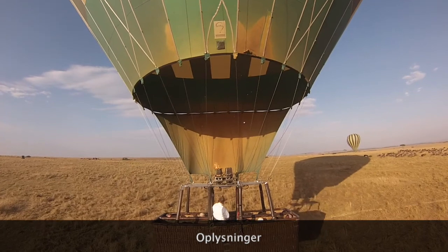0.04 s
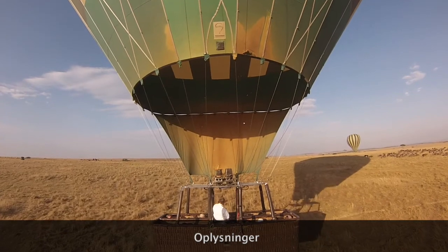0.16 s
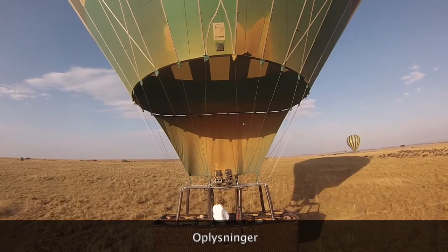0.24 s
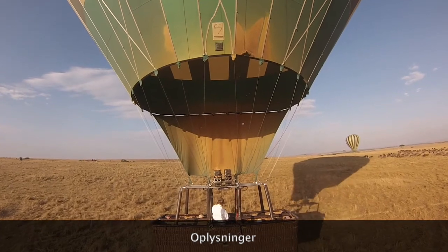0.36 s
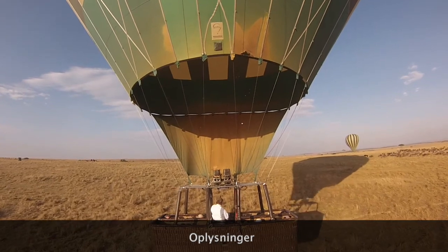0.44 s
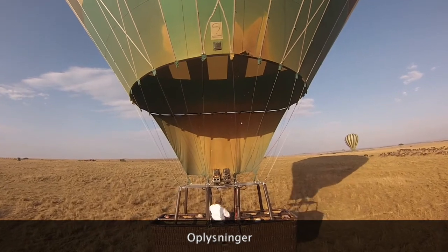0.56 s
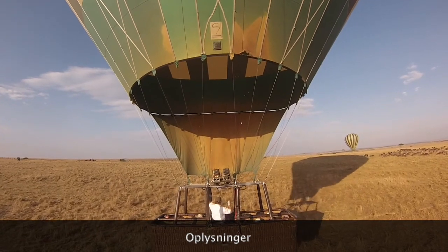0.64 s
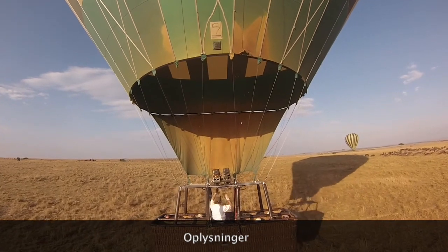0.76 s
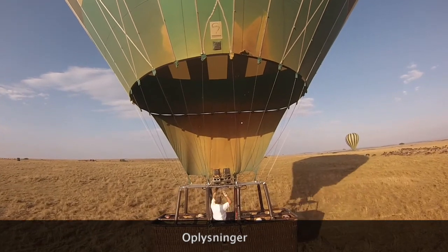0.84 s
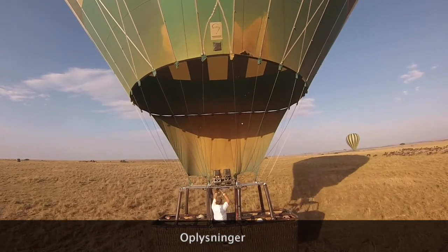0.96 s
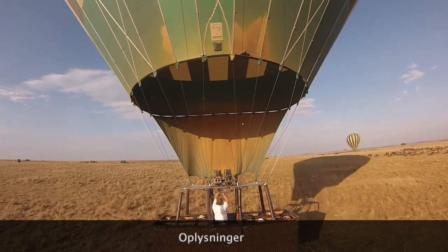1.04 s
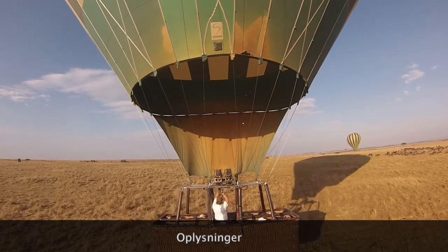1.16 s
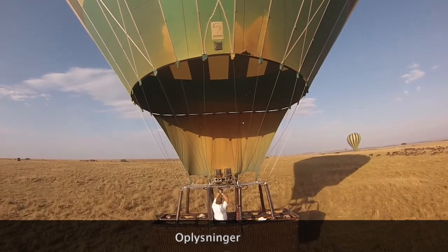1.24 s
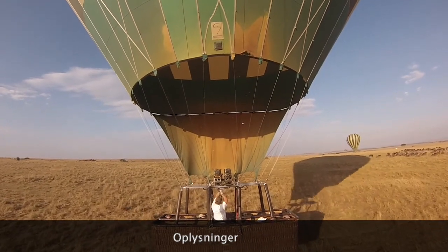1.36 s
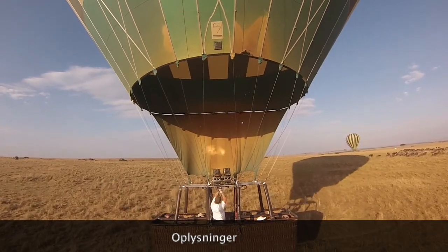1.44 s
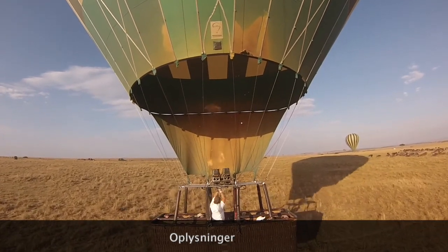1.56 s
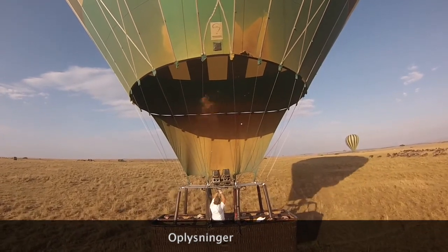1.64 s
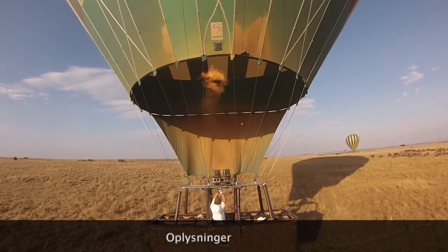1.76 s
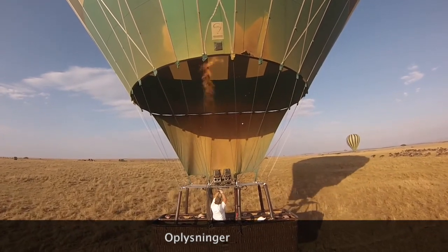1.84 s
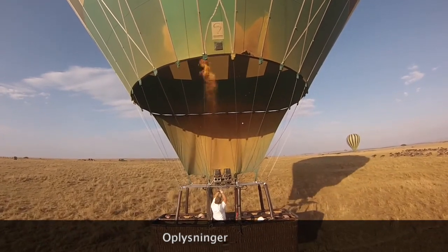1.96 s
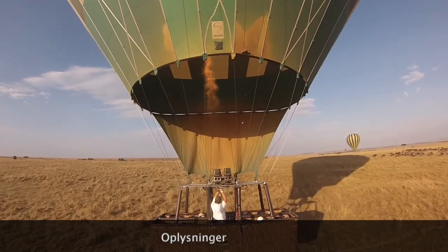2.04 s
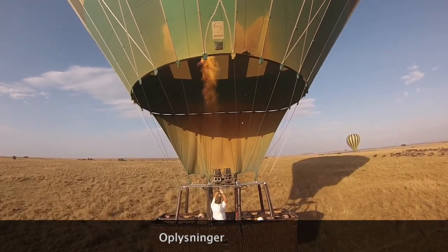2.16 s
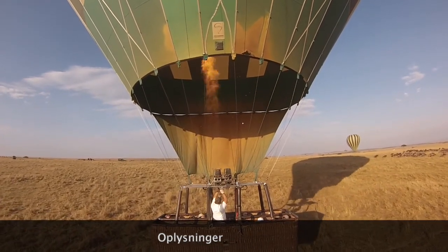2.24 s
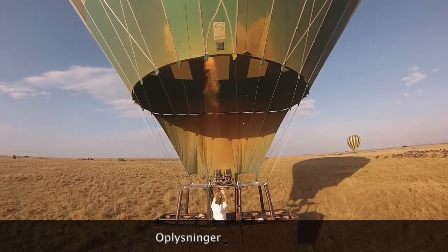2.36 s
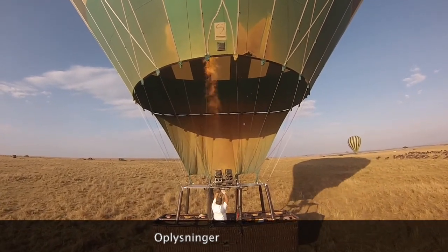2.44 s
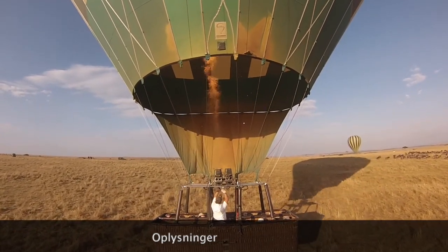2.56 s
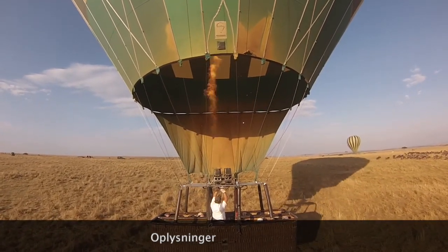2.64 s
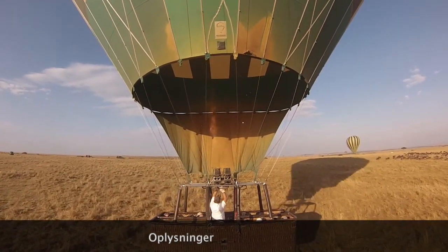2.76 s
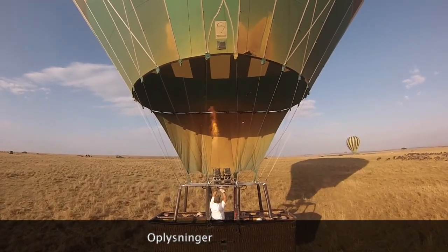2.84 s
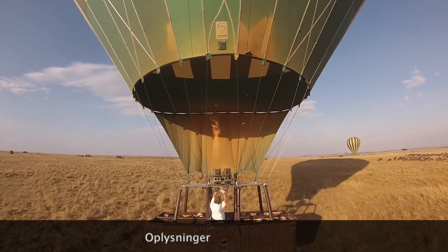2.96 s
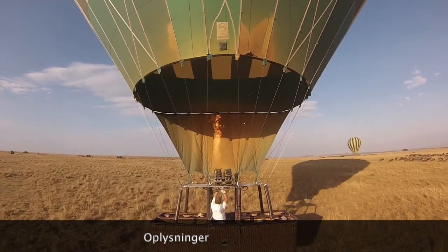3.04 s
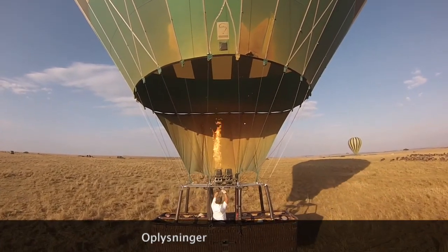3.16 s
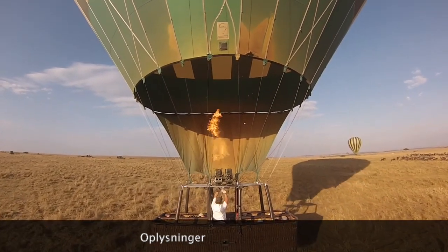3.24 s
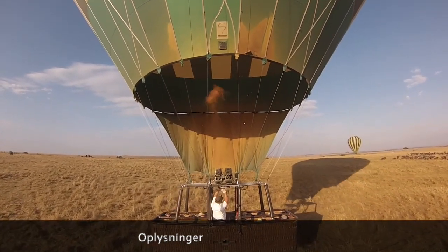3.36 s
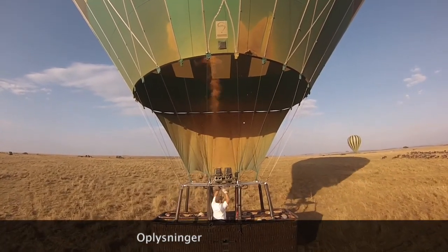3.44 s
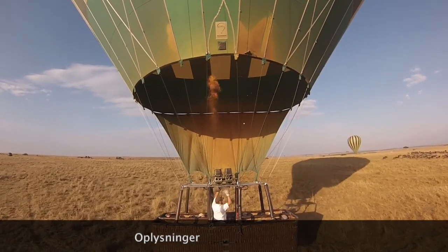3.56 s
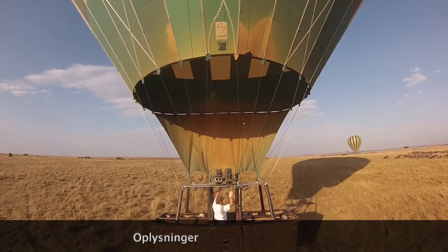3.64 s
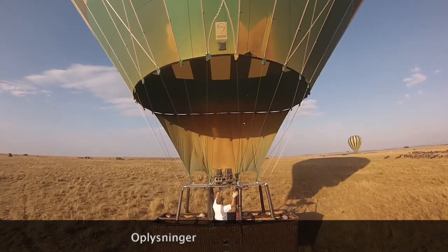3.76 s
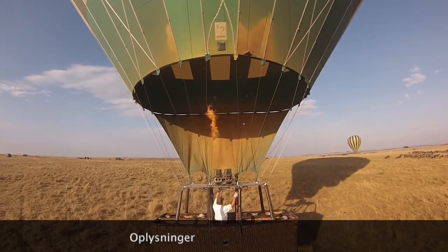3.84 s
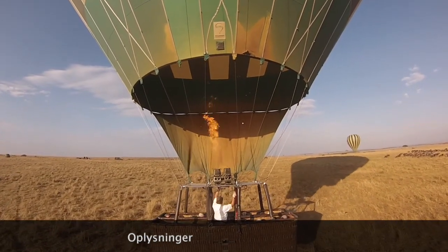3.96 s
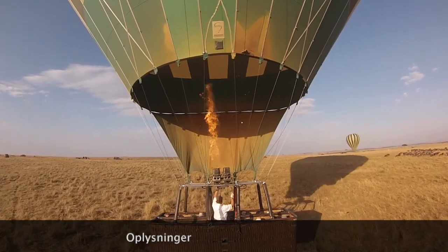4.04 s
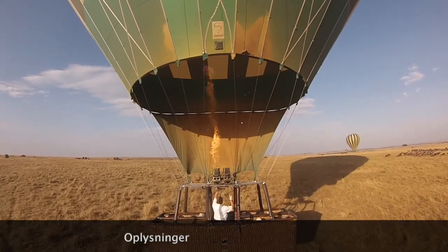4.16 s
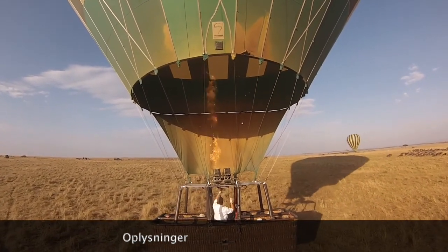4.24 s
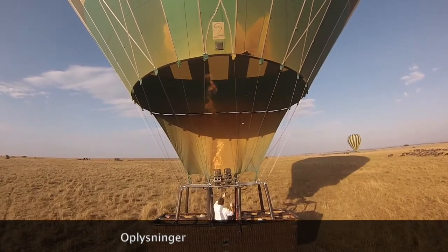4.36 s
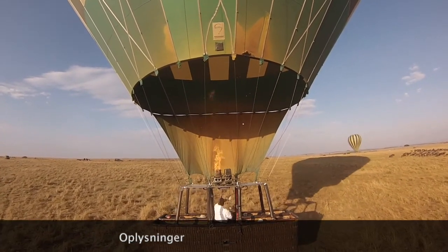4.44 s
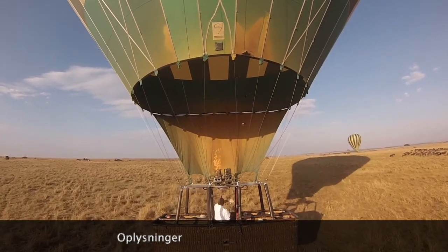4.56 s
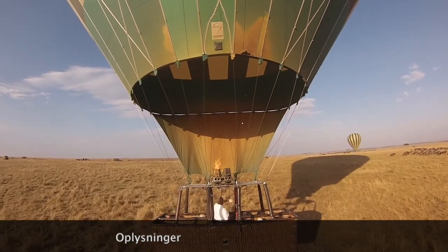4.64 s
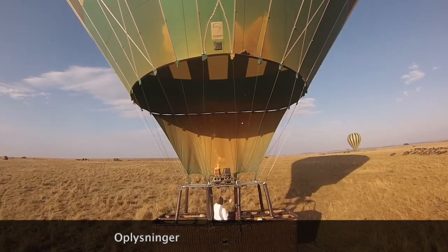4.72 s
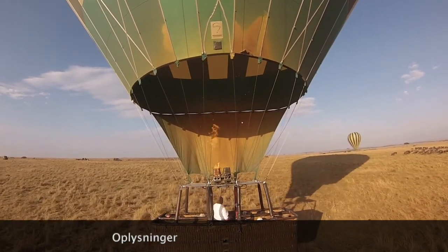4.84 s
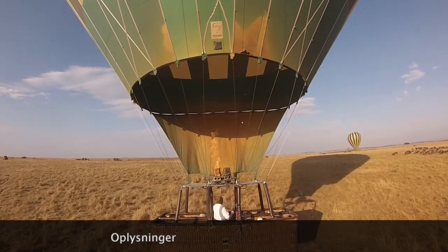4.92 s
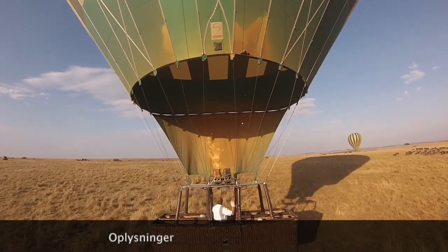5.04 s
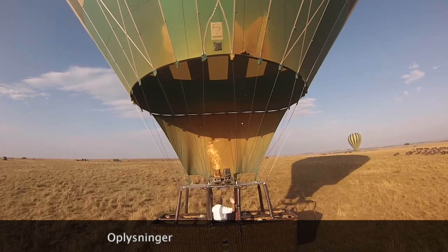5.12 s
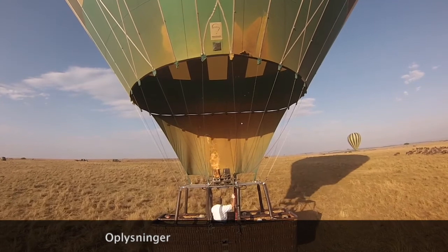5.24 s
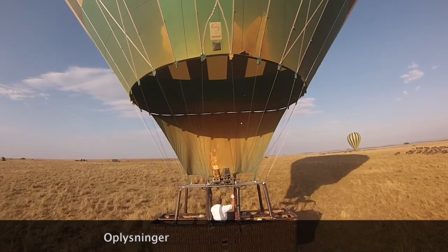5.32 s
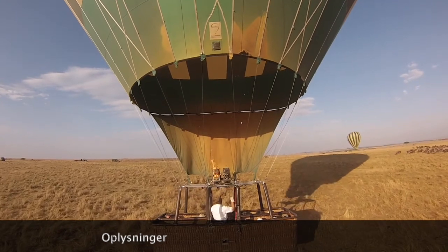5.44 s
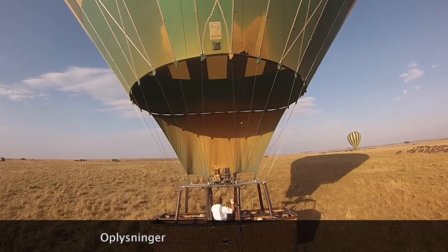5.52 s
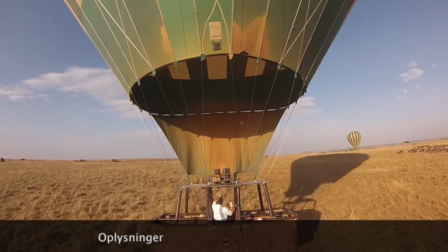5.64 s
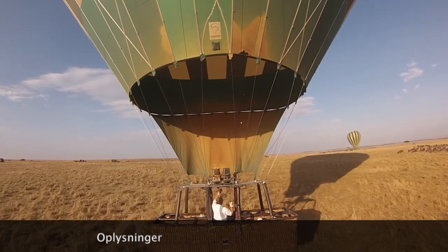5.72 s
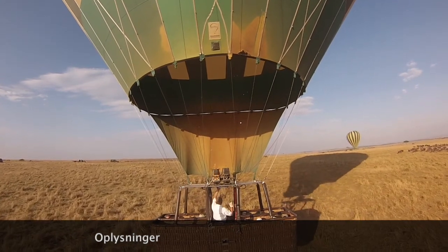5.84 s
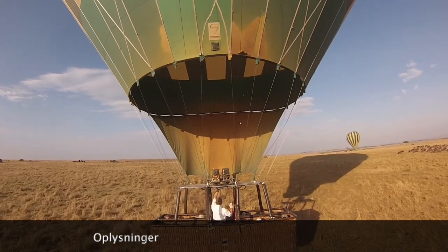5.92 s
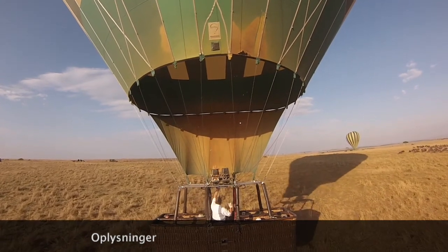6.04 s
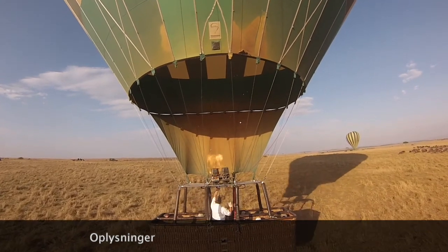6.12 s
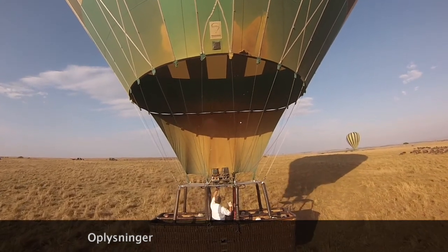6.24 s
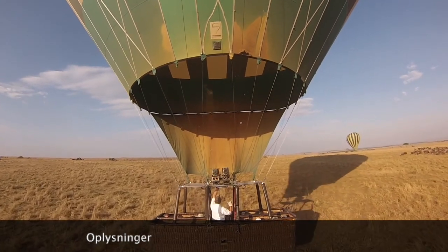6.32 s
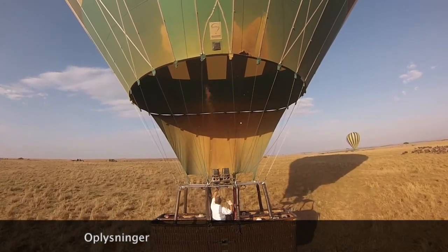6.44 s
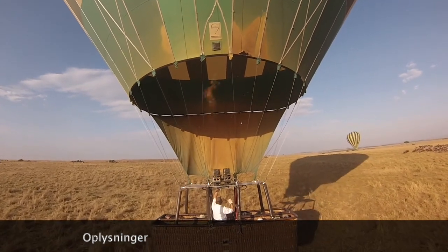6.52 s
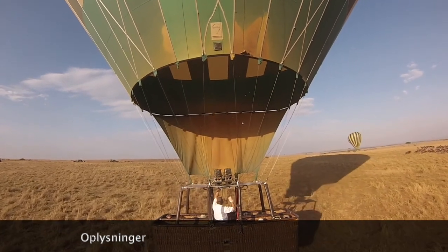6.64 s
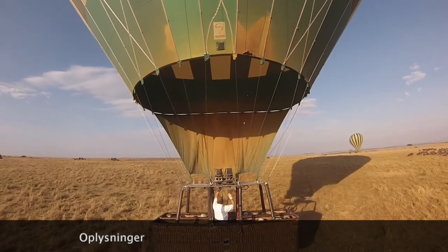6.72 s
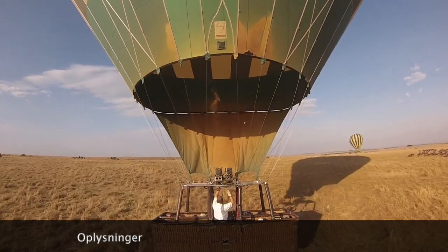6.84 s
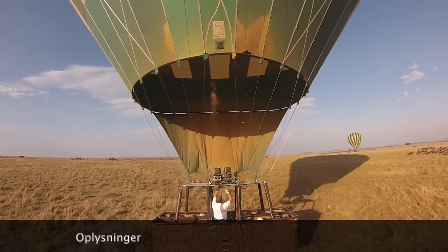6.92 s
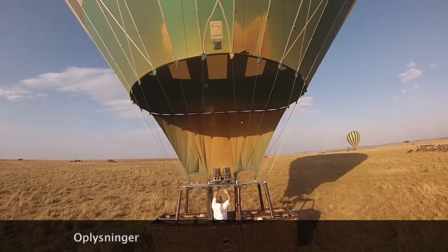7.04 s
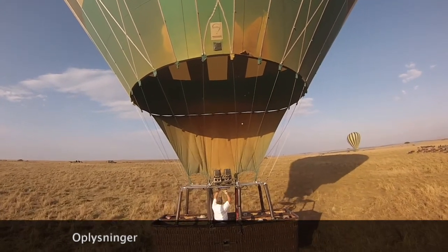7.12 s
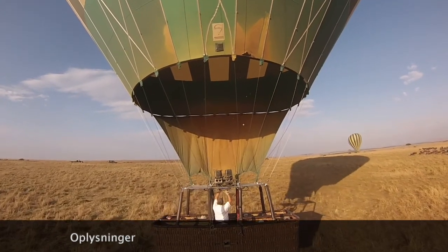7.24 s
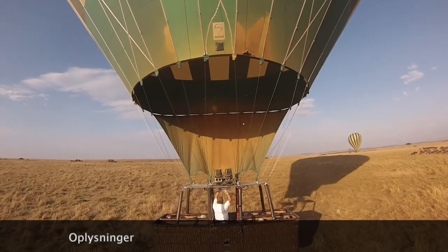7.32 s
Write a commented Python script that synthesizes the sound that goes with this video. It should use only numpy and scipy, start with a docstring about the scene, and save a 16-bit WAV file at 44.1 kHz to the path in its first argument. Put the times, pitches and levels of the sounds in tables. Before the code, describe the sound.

Over quiet open grassland, a balloon burner roars in four bursts of flame and hissing gas, the middle two almost joined.

```python
"""Hot-air balloon burner

A propane burner fires four blasts over quiet grassland, the middle two almost joined. Gas hisses from
the nozzles, the swirling flame roars above them and pockets of gas go off with dull thumps. After each
blast the gas line empties and the roar dies last. In between: light wind, the pilot flame, a few clinks."""
import sys
import numpy as np
from scipy import signal
from scipy.fft import rfft, irfft
from scipy.io import wavfile
from scipy.ndimage import uniform_filter1d

SR = 44100
rng = np.random.default_rng(int(sys.argv[2]) if len(sys.argv) > 2 else 0)


def put_to_file(sound):
    """Save the sound as 16-bit audio at rate SR, in the file named by the first command-line argument."""
    columns = np.atleast_2d(sound).T  # one column per channel
    safe = np.clip(columns, -1, 1)
    whole_steps = np.round(safe * 32767)
    wavfile.write(sys.argv[1], SR, whole_steps.astype(np.int16))


N = 325369
T = np.arange(N) / SR

# How strong each noise is from low to high pitch: pitch_hz, relative_db
WIND_SPECTRUM = [(8.8, -43), (15, 3), (27, -0.5), (48, 8.5), (70, -1.5), (103, -5.5), (130, -21),
                 (170, -50), (290, -120)]
PILOT_SPECTRUM = [(59, -21), (100, -4), (124, -7.5), (228, -4), (344, -9), (415, -13.5), (500, -9.5),
                  (661, -14.5), (1320, -17), (1790, -30), (2400, -41), (3120, -60), (5280, -120)]
PILOT_HISS_SPECTRUM = [(1290, -26), (2200, -5.5), (2470, -9), (2650, -6), (3100, -5.5), (3620, -0.5),
                       (3960, -7.5), (4300, -1), (5020, -13), (5860, -10.5), (6360, -12.5), (9260, -12),
                       (14500, -20.5), (15500, -23)]
CLINK_SPECTRUM = [(590, -54), (1000, -28), (1180, 2), (1330, 3), (1660, -28), (1820, -27), (2310, -37),
                  (2850, -7), (3890, -11), (4300, -1), (4960, -33), (5540, -16), (6050, -22), (8800, -15.5),
                  (14000, -37)]
HISS_SPECTRUM = [(1120, -40), (1900, -15), (2010, -16), (2250, -12), (2450, -17), (2800, -7.5),
                 (3240, -1.5), (3730, -3), (4230, 1), (4510, -1), (5010, -15), (5200, -22), (6760, -38),
                 (11400, -120)]
SIZZLE_SPECTRUM = [(3030, -39), (5150, -12), (5590, -4), (6350, -6.5), (6920, -2.5), (7520, -11),
                   (8010, -1), (8270, -0.5), (9480, 1), (10400, -3.5), (11900, -2), (12900, -9.5),
                   (14500, -8.5), (15300, -18)]
RUSH_SPECTRUM = [(500, -11), (850, -2.5), (1370, -2), (1590, -8.5), (1900, -24.5), (2470, -51),
                 (4180, -120)]
ROAR_SPECTRUM = [(11, -39), (18, -13.5), (75, 1.5), (135, -2.5), (178, 0), (217, -5), (251, -3),
                 (366, -6.5), (410, -9), (468, -9), (900, -22), (1170, -36), (1980, -120)]

# The breeze rising and falling: time_s, change_db
BREEZE_STRENGTH = [(0, 2), (.26, 4.5), (.5, -2), (1.1, 0), (1.3, -0.5), (5.5, -1), (6.0, 1.5)]
# Light knocks on the burner frame: start_s, relative_db, fade_s (time to drop 60 dB)
KNOCKS = [(0.01, -45.5, 0.088), (0.149, -42, 0.15), (.172, -57, .14), (3.088, -45, 0.082)]
# The tones of a struck fitting: pitch_hz, relative_db, fade_s
FITTING_TONES = [(1190, -1, .25), (2900, -10, .19), (4250, -2, .12), (5566, -13, .13)]
# The blasts: valve_opens_s, valve_shuts_s, rush_change_db, hiss_change_db
VALVE_BLASTS = [(1.342, 2.788, 0, .5), (3.145, 3.77, 0, 2), (3.841, 4.587, -3, -1), (6.05, 7.4, 0.5, -0.5)]
# Strength of the gas jet, one list for each blast: time_s, change_db
JET_STRENGTH = [
    [(1.45, -1), (1.58, -0.5), (1.62, 6.5), (1.78, 1), (1.9, 4.5), (2.322, 4), (2.345, -3.5), (2.58, 1.5),
     (2.6, -4), (2.8, -3), (2.92, -5.5)],
    [(3.25, 3), (3.5, 0), (3.75, -5)],
    [(3.93, -1), (4.05, 1.5), (4.42, -2.5), (4.445, -7), (4.58, -7.5)],
    [(6.13, 2), (6.2, 4.5), (6.35, 3), (6.39, -1.5), (6.55, 0.5), (6.57, -4.5), (6.65, -7), (6.86, -1.5),
     (7.15, -9.5), (7.24, -0.5), (7.36, 1)],
]
# How each part answers the valve: level_db, share_of_jet_change, rise_s, steepness, fade_db_per_s
ROAR_RESPONSE = (-15.5, 0.05, 0.1265, 1.14, 45.5)
RUSH_RESPONSE = (-30.5, 0.46, 0.0752, 4.8, 43)
HISS_RESPONSE = (-35, 0.76, 0.1544, 1.1, 53)
SIZZLE_RESPONSE = (-33, 1, 0.12, 2, 74)
# The level of the hiss dips briefly: middle_s, half_length_s, drop_db
HISS_DIPS = [(1.589, 0.0076, 15.5), (1.984, 0.016, 31), (2.933, 0.0084, 13), (6.3255, 0.0091, 13)]
# Thin tones heard during those dips: middle_s, half_length_s, pitch_hz, level_db
THIN_TONES = [(1.984, .022, 4450, -36), (1.993, .015, 3925, -37), (1.975, .012, 8940, -39),
              (1.986, .019, 8350, -37), (2.933, .014, 8635, -56), (6.325, .014, 3930, -39),
              (6.322, .017, 5566, -44)]
# The largest gas pockets going off: middle_s, relative_pressure, half_width_ms
GAS_POCKETS = [(1.4616, -0.93, 1.9), (1.7238, -0.67, 1.1), (1.7837, 0.57, 1.6), (2.0124, 0.41, 2.8),
               (2.3287, -0.72, 2.8), (2.5847, -0.63, 2.1), (2.7248, 0.29, 0.63), (3.216, 0.54, .68),
               (4.4314, 0.95, 1.2), (6.5362, -0.55, 0.64), (6.5578, -1.2, 1.0), (6.5993, 0.98, 1.3),
               (6.9336, -0.49, 1.5), (7.1062, 0.85, 1.56)]
# The flame flares and rushes louder: middle_s, half_length_s, boost_db
FLAME_FLARES = [(2.315, 0.021, 4), (3.255, 0.014, 3.5), (6.338, 0.039, 7)]
# The hollow ring of a flare: pitch_hz, width_hz, relative_db
FLARE_TONES = [(750, 77, 2), (1060, 50, -1), (1350, 40, -9)]
# The roar sags for a moment: middle_s, half_length_s, drop_db
ROAR_SAGS = [(2.47, 0.038, 2.5), (2.645, 0.03, 4.5), (6.69, 0.058, 4)]
# Narrow bands of the whole sound made louder or softer: pitch_hz, width_hz, change_db
COLOUR_BANDS = [(1390, 84, 1), (4050, 200, 0.5), (5580, 150, 2), (7060, 160, 2.5), (7600, 200, -6.5),
                (8380, 100, 2.5), (11800, 250, 2)]


def from_db(db):
    """Turn decibels into a number to multiply a sound by."""
    return 10 ** (np.asarray(db) / 20)


def unit_power(x):
    """Scale a sound to an average power of 1."""
    return x / np.sqrt(np.mean(x ** 2) + 1e-20)


def curve(points):
    """Join (time, value) points with straight lines."""
    return np.interp(T, *np.transpose(points))


def drift(rate_hz):
    """A smooth random wobble, about 1 in size, that changes at up to about rate_hz."""
    hz = np.arange(N // 2 + 1) * SR / N
    return unit_power(irfft(rfft(rng.standard_normal(N)) / (1 + (hz / rate_hz) ** 2), N))


def swell(middle_s, half_s):
    """A flat-topped bump of height 1."""
    return np.exp(-np.minimum(((T - middle_s) / half_s) ** 4, 50))


def bumps_db(rows):
    """Add up short swells in level."""
    return sum(db * swell(middle_s, half_s) for middle_s, half_s, db in rows)


def shaped_noise(spectrum):
    """Noise with the given spectrum, falling 80 dB per octave beyond its ends."""
    octave = np.log2(np.maximum(np.arange(N // 2 + 1) * SR / N, 1))
    hz, db = np.transpose(sorted(spectrum))
    outside = np.abs(octave - np.clip(octave, np.log2(hz[0]), np.log2(hz[-1])))
    gain = from_db(np.interp(octave, np.log2(hz), db) - 80 * outside)
    return unit_power(irfft(rfft(rng.standard_normal(N)) * gain, N))


def narrow_band(x, hz, width_hz):
    """Keep only the part of a sound near one pitch."""
    return signal.lfilter(*signal.iirpeak(hz, hz / width_hz, fs=SR), x)


def breathy_tone(hz, width_hz):
    """Noise narrowed until it has a pitch."""
    return unit_power(narrow_band(rng.standard_normal(N), hz, width_hz))


def wind(breeze_db):
    """Light wind rumbles, rising and falling with the breeze."""
    return from_db(-50 + breeze_db + drift(9)) * shaped_noise(WIND_SPECTRUM)


def pilot_flame(breeze_db):
    """Fanned by the breeze, the small flame murmurs and hisses. It whistles until the first blast."""
    murmur = from_db(-52.5 + 0.79 * breeze_db + 1.1 * drift(9)) * shaped_noise(PILOT_SPECTRUM)
    hiss = from_db(-63.8 + 0.4 * breeze_db + 0.44 * drift(20)) * shaped_noise(PILOT_HISS_SPECTRUM)
    whistle = breathy_tone(hz=3490, width_hz=3490 / 55) * from_db(-69.5 + 2 * drift(8))
    return murmur + hiss + whistle * (T < VALVE_BLASTS[0][0])


def clinks(rise_s):
    """Fittings rub and knock on the frame in short, bright bursts."""
    gain = np.zeros(N)
    for start_s, db, fade_s in KNOCKS:
        age_s = np.maximum(T - start_s, 0)
        gain += from_db(db + 2.5 - 60 * age_s / fade_s) * np.minimum(age_s / rise_s, 1)
    return gain * shaped_noise(CLINK_SPECTRUM)


def fitting_ring():
    """Every knock sets the same few tones ringing in a fitting."""
    knocks = np.zeros(N)
    for start_s, db, _ in KNOCKS:
        knocks[int((start_s + 0.004) * SR)] = from_db(db - 6)
    ring = np.zeros(N)
    for hz, db, fade_s in FITTING_TONES:
        decay = from_db(-60 / (fade_s * SR))
        angle = 2 * np.pi * hz / SR
        feedback = [1, -2 * decay * np.cos(angle), decay * decay]
        ring += from_db(db) * signal.lfilter([0, np.sin(angle)], feedback, knocks + 1e-18)
    return ring


def valve_gain(response, changes_db=(0, 0, 0, 0)):
    """One part of the burner grows as the valve opens, follows the jet and fades once it shuts."""
    level_db, jet_share, rise_s, steepness, fade_db_per_s = response
    gain = np.zeros(N)
    for (opens_s, shuts_s, *_), jet, change_db in zip(VALVE_BLASTS, JET_STRENGTH, changes_db):
        rise = np.sin(np.pi / 2 * np.clip((T - opens_s) / rise_s, 0, 1)) ** (2 * steepness)
        held_db = level_db + jet_share * curve(jet) + change_db
        fade_db = fade_db_per_s * np.maximum(T - shuts_s, 0)
        gain = np.hypot(gain, rise * from_db(held_db - fade_db))  # overlapping blasts add in power
    return gain


def dips_and_tones(hiss):
    """The level of the hiss dips briefly and thin tones are heard."""
    tones = sum(from_db(db) * swell(middle_s, half_s) * np.sqrt(2) * np.sin(2 * np.pi * hz * T)
                for middle_s, half_s, hz, db in THIN_TONES)
    return hiss * from_db(-bumps_db(HISS_DIPS)) + tones


def gas_jet(hiss_gain, sizzle_gain, flutter_db):
    """Propane leaves the nozzles in a sputtering hiss."""
    sputter_db = 0.96 * flutter_db + 0.23 * drift(150)
    hiss = hiss_gain * from_db(-0.4 + 0.5 * drift(23)) * shaped_noise(HISS_SPECTRUM)
    sizzle = sizzle_gain * from_db(-0.37) * shaped_noise(SIZZLE_SPECTRUM)
    return (hiss + sizzle) * from_db(sputter_db)


def thumps():
    """Each gas pocket goes off as one pulse of pressure with a shallow rebound on either side."""
    pulses = np.zeros(N)
    for middle_s, pressure, half_ms in GAS_POCKETS:
        offset_squared = np.minimum(((T - middle_s) * 1000 / half_ms) ** 2, 60)
        pulses += pressure * (1 - offset_squared) * np.exp(-0.68 * offset_squared)
    return from_db(-1) * pulses


def flare_ring(extra_rush_gain):
    """The extra rush of a flare makes the flame ring hollowly."""
    ring = sum(from_db(db) * breathy_tone(hz, width_hz) for hz, width_hz, db in FLARE_TONES)
    return from_db(-4.5) * extra_rush_gain * unit_power(ring)


def crackle(spectrum, pops_per_s, spread_db):
    """Small swirls of gas catch fire at random, making pops of uneven size."""
    sizes = from_db(spread_db * np.minimum(rng.exponential(1, N), 4)) * rng.choice([-1, 1], N)
    pops = sizes * (rng.random(N) < pops_per_s / SR)
    hz, db = np.transpose(sorted(spectrum))
    gain = np.interp(np.arange(N // 2 + 1) * SR / N, hz, from_db(db), left=0, right=0)
    return unit_power(irfft(rfft(pops) * gain, N))


def steady(x, span_s):
    """Even out slow swells: a steady flow of gas burns with steady power."""
    return x / np.sqrt(uniform_filter1d(x ** 2, int(span_s * SR)) + 1e-9)


def flame(roar_gain, rush_gain, flutter_db):
    """Large swirls of burning gas roar, small ones rush and crackle. Both flutter with the jet."""
    roar = steady(shaped_noise(ROAR_SPECTRUM), span_s=0.078)
    roar *= from_db(flutter_db + 0.24 * drift(40) - 0.16)
    # A dying flame loses its largest swirls first, and with them the deepest rumble.
    rumble = signal.sosfiltfilt(signal.butter(1, 90, fs=SR, output="sos"), roar)
    dying = np.clip(1 - roar_gain / from_db(-45), 0, 1)
    rush = shaped_noise(RUSH_SPECTRUM)
    rush += from_db(-11.5) * crackle(RUSH_SPECTRUM, pops_per_s=1400, spread_db=1.5)
    rush = steady(rush, span_s=0.043) * from_db(flutter_db + 0.5 * drift(60) + 0.1)
    return roar_gain * (roar - 0.5 * dying * rumble) + rush_gain * rush


def scene():
    """The valve feeds jet and flame, which share one flutter, over the quiet background."""
    _, _, rush_changes_db, hiss_changes_db = zip(*VALVE_BLASTS)
    roar_gain = valve_gain(ROAR_RESPONSE) * from_db(-bumps_db(ROAR_SAGS))
    rush_gain = valve_gain(RUSH_RESPONSE, rush_changes_db)
    flared_gain = rush_gain * from_db(bumps_db(FLAME_FLARES))
    hiss_gain = valve_gain(HISS_RESPONSE, hiss_changes_db)
    flutter_db = drift(rate_hz=21.6)
    burner = flame(roar_gain, flared_gain, flutter_db) + thumps()
    hiss = dips_and_tones(gas_jet(hiss_gain, valve_gain(SIZZLE_RESPONSE), flutter_db))
    breeze_db = curve(BREEZE_STRENGTH)
    background = clinks(rise_s=0.007) + fitting_ring() + wind(breeze_db) + pilot_flame(breeze_db)
    return (background + hiss + burner + flare_ring(flared_gain - rush_gain))[None]


def record(dry):
    """Colour the sound, round off its loudest peaks and cut the highest treble."""
    peak_limit, cutoff_hz = 0.98, 15300
    heard = dry
    for hz, width_hz, db in COLOUR_BANDS:
        heard = heard + (from_db(db) - 1) * narrow_band(heard, hz, width_hz)
    rounded = heard / (1 + (heard / peak_limit) ** 8) ** (1 / 8)
    return signal.sosfilt(signal.ellip(12, 0.1, 80, cutoff_hz, fs=SR, output="sos"), rounded)


dry = scene()
out = record(dry)
put_to_file(out)
```